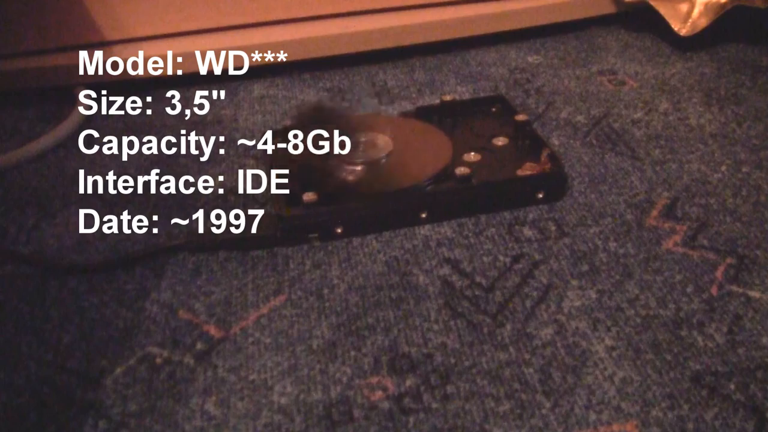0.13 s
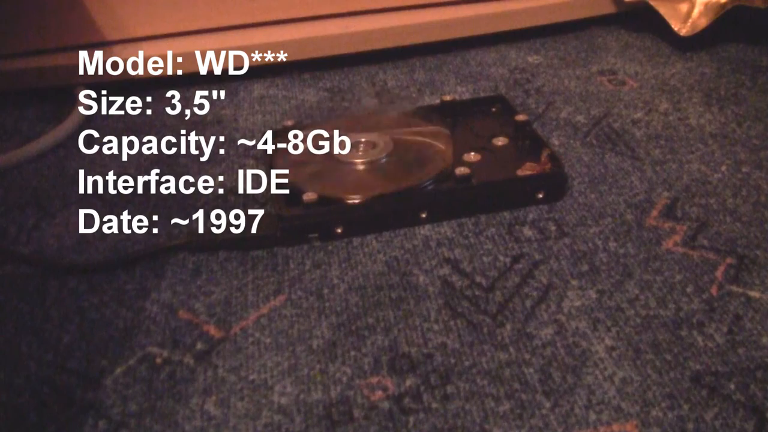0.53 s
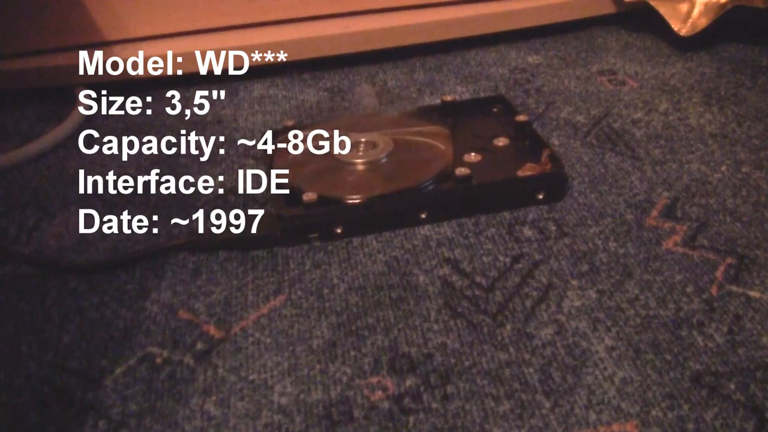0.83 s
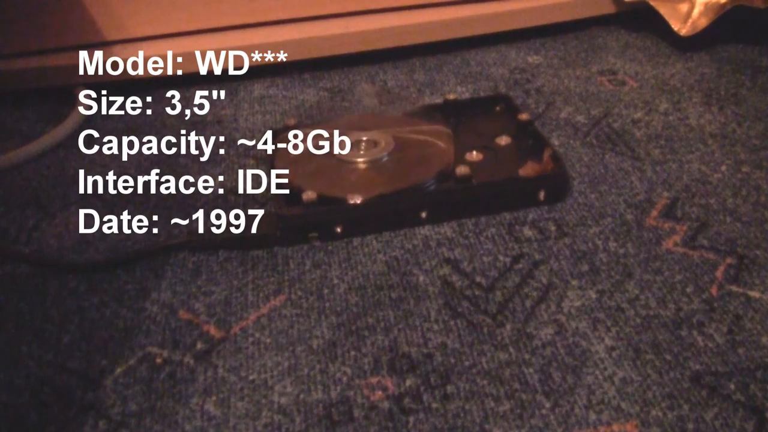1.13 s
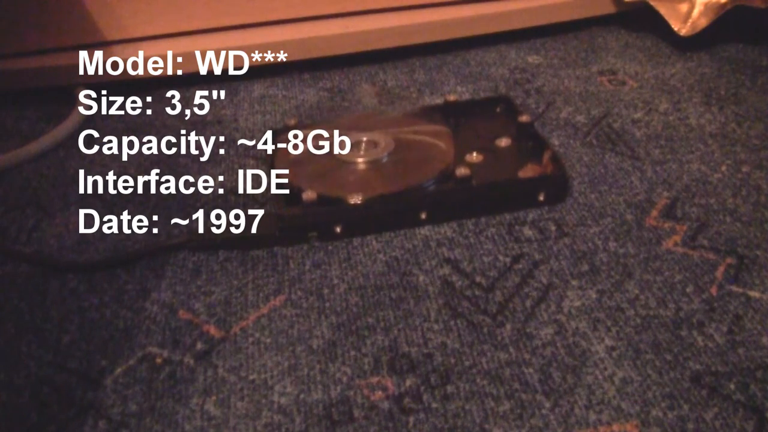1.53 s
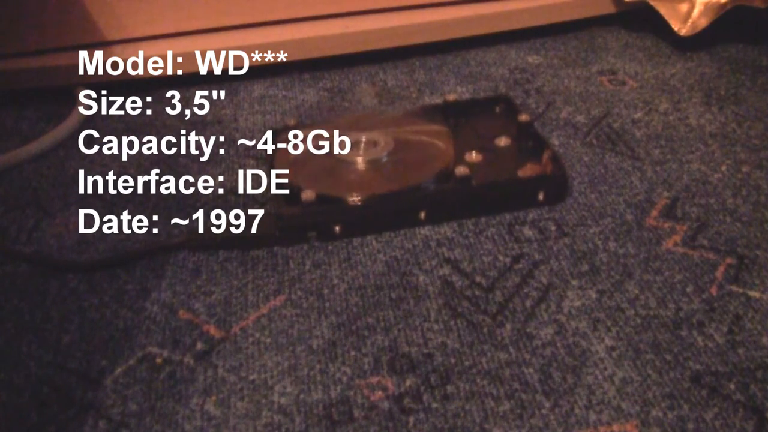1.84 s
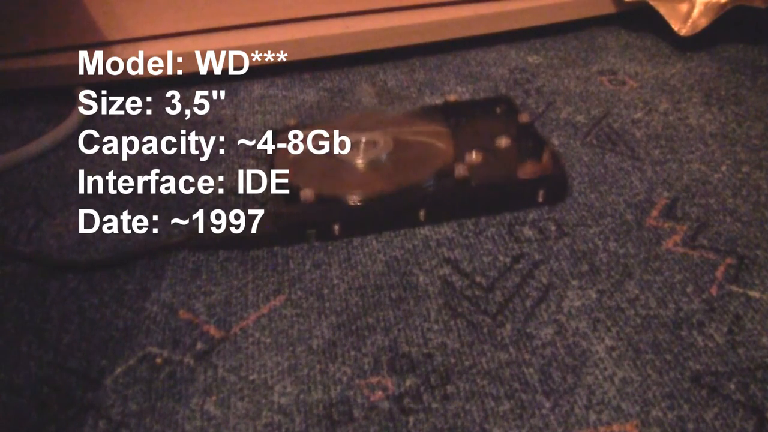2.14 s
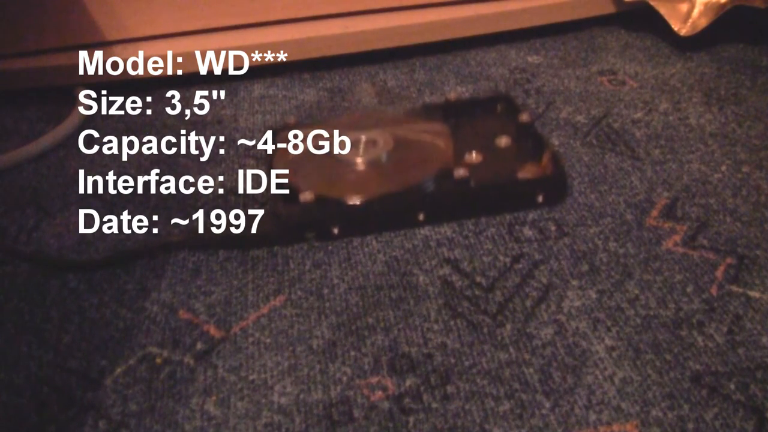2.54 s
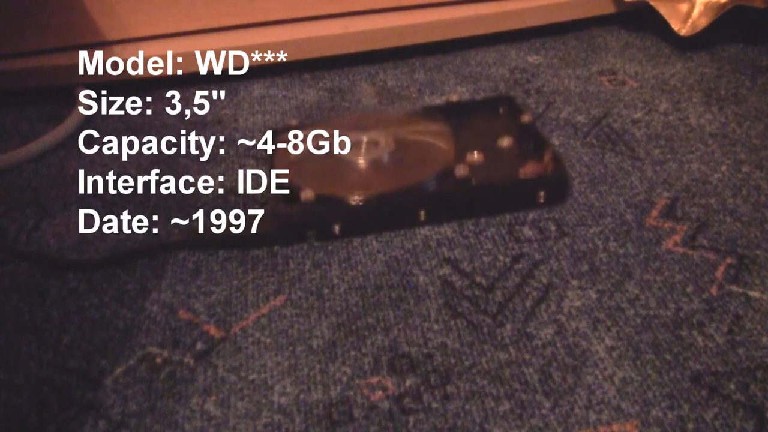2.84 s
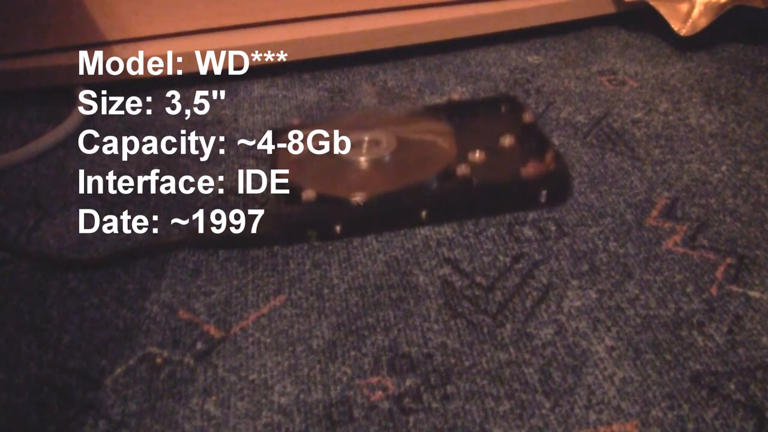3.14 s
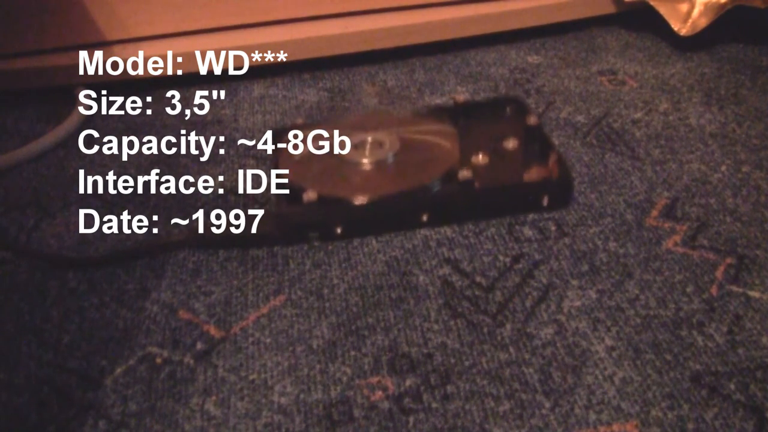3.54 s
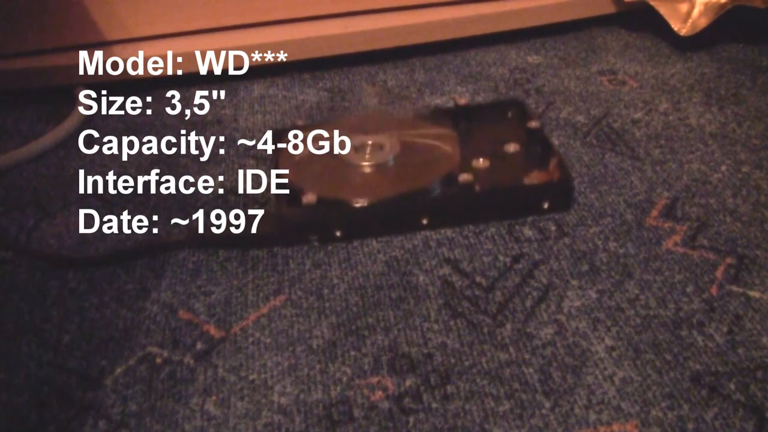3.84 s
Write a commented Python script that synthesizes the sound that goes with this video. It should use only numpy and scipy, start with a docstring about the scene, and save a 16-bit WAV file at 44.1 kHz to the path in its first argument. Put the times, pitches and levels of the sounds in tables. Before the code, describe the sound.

An opened hard drive spins up close by in a quiet room. A faint, thin whistle starts at about 0.2 seconds, with a soft swish near 0.5. From around 0.8 seconds a ringing metallic whirr climbs in pitch and loudness. Dull, irregular knocks come between 1.3 and 3.6 seconds, while a hum and rushing air swell into a roar that is nearly steady from about 3 seconds on.

```python
"""In a quiet room, an opened hard drive lies close by on a carpet and spins up.
The motor driver whistles, the shaft hums and the casing knocks dully. The ball bearings
sing rising tones through the ringing casing and platters (the spinning discs).
The air dragged round by the platters grows to a steady roar."""
import sys
import numpy as np
from scipy.fft import rfft, irfft, next_fast_len
from scipy.io import wavfile
from scipy.ndimage import uniform_filter1d, map_coordinates

SR = 44100
rng = np.random.default_rng(int(sys.argv[2]) if len(sys.argv) > 2 else 0)


def materialize(psi):
    """Save the field psi as 16-bit PCM at rate SR to the path in sys.argv[1].

    A 1-D psi becomes a single channel; in a 2-D psi each row is a channel.
    """
    bounded = np.clip(np.atleast_2d(psi).T, -1, 1)
    quanta = np.round(bounded * 32767).astype(np.int16)
    wavfile.write(sys.argv[1], SR, quanta)


N = 176400

START_S, FULL_HZ = .21, 76.95  # when the motor starts; its top speed in turns a second
PASSES_PER_TURN = 4.825  # how many balls roll past one spot in each turn


def amp(db):
    """Turns decibels into a factor to multiply by."""
    return 10 ** (np.asarray(db) / 20)


def unit(x):
    """Scales a signal to an average power of 1."""
    return x / np.sqrt(np.mean(x ** 2) + 1e-20)


def along(points, hz):
    """Reads between rows of (Hz, value), spacing the frequencies by octaves."""
    freqs, values = np.transpose(points)
    return np.interp(np.log(hz + 1), np.log(freqs + 1), values)


def wobble(rate):
    """A smooth curve through `rate` random values a second."""
    return map_coordinates(rng.standard_normal(int(N * rate / SR) + 4), [np.arange(N) * rate / SR])


def filtered(x, response):
    """Multiplies each frequency in x by response(hz)."""
    size = next_fast_len(N + SR // 2)
    return irfft(rfft(x, size) * response(np.fft.rfftfreq(size, 1 / SR)), size)[..., :N]


def high_pass(x, hz):
    """Keeps what lies above hz."""
    return x - filtered(x, lambda f: 1 / (1 + (f / hz) ** 10))


def noise(spectrum):
    """Noise of power 1, shaped by rows of (Hz, dB)."""
    return unit(filtered(rng.standard_normal(N), lambda hz: amp(along(spectrum, hz))))


def bell(x, centre, width):
    """The peak that a resonance makes around its pitch."""
    return 1 / (1 + (2 * (x - centre) / width) ** 2)


def swell(x, centre, width):
    """A smooth rise and fall around a centre."""
    return np.exp(-((x - centre) / width) ** 2)


def partials(rows, turns, waver_db, waver_rate):
    """Pure tones that follow a rotation, each wavering in level."""
    tones = np.zeros(N)
    for multiple, db in rows:
        gain = np.sqrt(2) * amp(db + waver_db * wobble(waver_rate))
        tones += gain * np.sin(2 * np.pi * (multiple * turns + rng.random()))
    return tones


def spread(x, width):
    """Weak, scattered reflections make left and right differ."""
    t = np.arange(SR // 4) / SR
    tail = rng.standard_normal(len(t)) * amp(-60 * t / 0.33)
    scatter = lambda hz: np.exp(1j * np.angle(rfft(tail, 2 * len(hz) - 2)))
    side = filtered(x, lambda hz: amp(along(width, hz)) * scatter(hz))
    return np.array([x + side, x - side])


def room_noise():
    """The faint, steady, low rush of the room."""
    # The room's tone. Each row: frequency in Hz, relative level in dB.
    spectrum = [(24, -49), (40, -12), (91, -10), (102, -11), (154, -4), (206, -8.5), (244, -6),
                (359, -13.5), (504, -14.5), (1040, -18), (10000, -36), (12800, -40), (16600, -68),
                (22000, -120)]
    return amp(-51) * noise(spectrum)


def swish(t):
    """One brief, soft swish."""
    # The swish's tone. Each row: frequency in Hz, relative level in dB.
    spectrum = [(88, -33), (150, -15), (222, 1), (458, -4), (928, -4), (1680, -2.5), (5850, -11.5),
                (12800, -39), (16600, -64), (22000, -120)]
    return amp(-44) * noise(spectrum) * swell(t, centre=0.488, width=0.061)


def spindle(t, climb_hz_per_s=36.7, ease_s=.86):
    """Turns a second: the motor pushes evenly at first, then eases towards top speed."""
    gap_hz = climb_hz_per_s * ease_s
    ease_from_s = START_S + (FULL_HZ - gap_hz) / climb_hz_per_s
    climbing = climb_hz_per_s * np.maximum(t - START_S, 0)
    easing = FULL_HZ - gap_hz * np.exp((ease_from_s - t) / ease_s)
    return np.where(t < ease_from_s, climbing, easing)


def driver_whistle(t, turns, beats_per_turn=1.3, stutter_db=3):
    """A thin, high whistle that pulses as the motor coils are switched."""
    # The whistle's peaks. Each row: pitch in Hz, half-width in Hz, relative level in dB.
    peaks = [(7040, 70, 0.5), (7730, 70, -2), (8380, 90, -5), (8800, 60, -6), (10500, 250, -11.5)]
    response = lambda hz: sum(amp(db) * bell(hz, pitch, 2 * half) for pitch, half, db in peaks)
    tone = filtered(rng.standard_normal(N), response)
    tone = unit(tone * amp(stutter_db * wobble(39.9)))
    fade_in = np.clip((t - START_S) / 0.1, 0, 1)
    pulse = 1 + 0.15 * np.cos(2 * np.pi * beats_per_turn * turns)
    return amp(-61.5) * tone * fade_in * pulse


def shaft_hum(spin_hz, turns):
    """The shaft's hum grows with speed and wavers most while the motor still strains."""
    # The hum's tones. Each row: multiple of the turning rate, relative level in dB.
    tones = [(1, -34.5), (2, -27.5), (3, -35.5), (4, -38), (5, -36), (7, -35.5), (8, -34.5)]
    speed = spin_hz / FULL_HZ
    hum = partials(tones, turns, waver_db=1.2 + 7.5 * (1 - speed), waver_rate=14)
    fade_in = 1 - np.exp(-(spin_hz / 53.2) ** 4)
    return high_pass(hum * speed ** 1.56 * fade_in, hz=64.5)  # the hum's deepest bass is cut away


def knocks(attack_s=0.00032):
    """The loose drive shudders: each dull knock briefly rings the low tones of its casing."""
    # The knocks. Each row: start in seconds, relative level in dB, factor on the pitch.
    hits = [(1.258, -32, 0.71), (1.282, -18.5, 0.66), (1.383, -23, .9), (1.908, -17, 0.92),
            (2.349, -9.5, 0.94), (2.417, -11.5, 1.33), (2.496, -13, 0.98), (2.609, -11, 0.85),
            (2.643, -13, 1.03), (2.708, -14, 0.66), (2.734, -17, 0.92), (2.887, -13, 0.89),
            (3.143, -6.5, 1.05), (3.335, -9, 1.14), (3.514, -9, 1.02), (3.565, -11.5, 1)]
    # The casing's tones. Each row: base pitch in Hz, relative level in dB, seconds to fade by 60 dB.
    modes = [(246, -7.5, 0.041), (414, -3.5, 0.045), (606, -6.5, 0.034), (855, -6.5, 0.024)]
    hz, level, fade_s = np.transpose(modes)[:, :, None]
    track, t = np.zeros(N + SR), np.arange(SR // 10) / SR
    for start, db, pitch in hits:
        phase = rng.random((len(hz), 1))
        tones = amp(level - 60 * t / fade_s) * np.sin(2 * np.pi * (pitch * hz * t + phase))
        attack = 1 - np.exp(-t / attack_s)
        track[round(start * SR):][:len(t)] += amp(db) * tones.sum(axis=0) * attack
    return high_pass(track[:N], hz=136)


def rushing_air(t, spin_hz):
    """Air torn along by the platters: a lumpy roar and a finer hiss, growing steeply with speed."""
    # The tone of the deep roar, main roar and hiss. Each row: frequency in Hz, relative level in dB.
    deep_spectrum = [(40, -22), (70, 0.5), (110, -3), (230, 4), (380, -5), (600, -31), (1500, -44)]
    roar_spectrum = [(30, -49), (55, -39), (80, -11.5), (105, -2.5), (170, -6.5), (240, -3), (450, 0),
                     (610, 1.5), (720, -4), (1000, -8.5), (1600, -13), (3000, -25), (8000, -60)]
    hiss_spectrum = [(500, -18), (1500, -4.5), (3200, 1), (5200, 0), (5900, -4), (6900, -3.5), (7800, -12),
                     (9200, -10.5), (10400, -14.5), (11700, -27.5), (12700, -34), (13300, -56)]
    # Brief swells of the roar. Each row: peak time in seconds, half-width in seconds, boost in dB.
    swells = [(1.27, 0.047, 6.5), (1.41, 0.017, 1.5), (1.9, 0.035, 1.5), (2.71, 0.024, 3.5)]
    speed = spin_hz / FULL_HZ
    deep = amp(-36) * noise(deep_spectrum) * swell(spin_hz, 48.9, 13.7)  # only at middling speeds
    eddies = unit(amp(wobble(110) + 0.33 * wobble(14)))
    surges = amp(sum(db * swell(t, peak_s, width) for peak_s, width, db in swells))
    roar = amp(-20.5) * noise(roar_spectrum) * speed ** 3.49
    hiss = unit(noise(hiss_spectrum) * amp(1.3 * wobble(200) + 0.26 * wobble(22)))
    return (roar + deep) * eddies * surges + amp(-25) * hiss * speed ** 4.07


def ringing_metal(grind, passes):
    """Platters and casing ring; grinding and passing balls stir each resonance by different amounts."""
    # The metal's overall tone. Each row: frequency in Hz, relative level in dB.
    spectrum = [(300, -38), (900, -14.5), (1400, -6), (1700, -10.5), (2300, -7.5), (3200, -2), (3900, -1),
                (4300, -6), (5100, -4), (5800, -16.5), (7000, -15), (8000, -30), (11000, -36), (13000, -48)]
    # Its resonances. Each row: pitch in Hz, width in Hz, boost in dB for grinding, then for passes.
    modes = [(1175, 18, 11.5, 0), (1698, 20, 15, 22), (1895, 35, 13, 6), (2005, 19.5, 11, 19.5),
             (2083.5, 16.4, 14.5, 18), (2128, 21, 14.5, 13), (2515, 18, 10, 19), (2790, 40, 12, 11),
             (2844, 21, 5, 14), (3104, 99, 5, 12.5), (3266, 92, 3.5, 11), (3487, 74, 8, 7.5),
             (3800, 260, 4, 6.5), (4600, 270, 4.5, -4)]

    def response(hz, column):
        boost = sum((amp(row[column]) ** 2 - 1) * bell(hz, row[0], row[1]) for row in modes)
        return amp(along(spectrum, hz)) * np.sqrt(1 + boost.clip(0))

    return filtered(grind, lambda hz: response(hz, 2)) + filtered(passes, lambda hz: response(hz, 3))


def grinding(turns, steps_per_turn=2048):
    """The balls roll over fine grain and regular waves in their tracks: a whirr rising with speed."""
    # How uneven the tracks are. Each row: bumps per turn, relative strength in dB.
    bumps = [(28, -6.5), (44, -2), (55, -2.5), (66, 0), (75, -2.5), (84, -7), (110, -3.5), (145, -12),
             (200, -9.5), (400, -9)]
    laps = int(turns[-1]) + 2
    profile = amp(along(bumps, np.arange(laps * steps_per_turn // 2 + 1) / laps))

    def roll_over(spectrum):
        surface = irfft(spectrum * profile)
        return unit(map_coordinates(surface, [turns * steps_per_turn], mode="wrap"))

    # Five waves cluster around each multiple of the rate at which the balls pass.
    waves_per_turn = (PASSES_PER_TURN * np.arange(2, 60)[:, None] + np.arange(-2, 3)).ravel()
    heights = amp(2.5 * rng.standard_normal(len(waves_per_turn)))
    phases = np.exp(2j * np.pi * rng.random(len(waves_per_turn)))
    waves = np.zeros(len(profile), complex)
    waves[np.round(waves_per_turn * laps).astype(int)] = heights * phases
    grain = roll_over(rfft(rng.standard_normal(laps * steps_per_turn)))
    rough_grain = unit(grain * amp(3 * wobble(300)))
    return amp(2) * rough_grain + amp(-2) * roll_over(waves)


def bearings(t, turns):
    """Passing balls and their grinding make the metal sing; faster is brighter."""
    # The balls' strong tones. Each row: multiple of their passing rate, relative level in dB.
    tones = [(6, -4.5), (7, -12), (8, -7), (9, -5.5), (10, -15), (11, -9.5), (12, -8), (13, -9), (14, -5),
             (15, -7), (16, -4), (18, -4)]
    # How the bearings grow louder. Each row: time in seconds, relative level in dB.
    loudness = [(0.6, -55), (0.76, -49), (0.82, -43.5), (1.04, -33.5), (1.55, -24), (2.02, -23.5),
                (2.26, -22), (3.4, -20.5), (3.95, -21.5)]
    passes = amp(-11) * partials(tones, PASSES_PER_TURN * turns, waver_db=2.5, waver_rate=22)
    passes = high_pass(passes, hz=1400)  # lower tones hardly reach the air
    ring = ringing_metal(grinding(turns), passes)
    power = np.abs(uniform_filter1d(ring ** 2, size=SR // 3))
    ring /= np.sqrt(power + 1e-12)  # even out the level, so that the table shapes it
    times, db = np.transpose(loudness)
    fade_in = np.clip((t - START_S) / (times[0] - START_S), 0, 1)
    return ring * amp(np.interp(t, times, db) - 1) * fade_in


def scene():
    """Hum, bearings, air and whistle follow one spin-up; knocks, a swish and the room join them."""
    # Stereo width of the drive and of the quiet sounds.
    # Each row: frequency in Hz, level in dB of the reflections against the direct sound.
    drive_width = [(60, -62), (150, -43.5), (350, -25), (860, -24), (2090, -18.5), (5070, -17),
                   (10000, -14), (12500, 1.5)]
    quiet_width = [(60, -32), (170, -12), (500, -1), (1460, -2.5), (4250, -9.5), (12300, -4)]
    # Stereo balance. Each row: frequency in Hz, level in dB of the left against the right.
    balance = [(60, -4), (170, 0.0), (500, 0.5), (1460, 0.0), (4250, 0.5), (12300, -1.5)]
    t = np.arange(N) / SR
    spin_hz = spindle(t)
    turns = np.cumsum(spin_hz) / SR
    drive = shaft_hum(spin_hz, turns) + bearings(t, turns) + rushing_air(t, spin_hz) + knocks()
    soft_swish = swish(t)
    stereo = spread(drive, drive_width)
    stereo += spread(driver_whistle(t, turns) + soft_swish + room_noise(), quiet_width)
    return filtered(stereo, lambda hz: amp(along(balance, hz) * np.array([[.5], [-.5]])))


def record(dry):
    """The sound comes in after a moment of silence, with its highest treble cut away."""
    silence_s, fade_s, top_hz = 0.1656, 0.012, 13200
    fade_in = np.clip((np.arange(N) / SR - silence_s) / fade_s, 0, 1)
    return filtered(dry * fade_in, lambda hz: 1 / (1 + (hz / top_hz) ** 60))


dry = scene()
out = record(dry)
materialize(out)
```